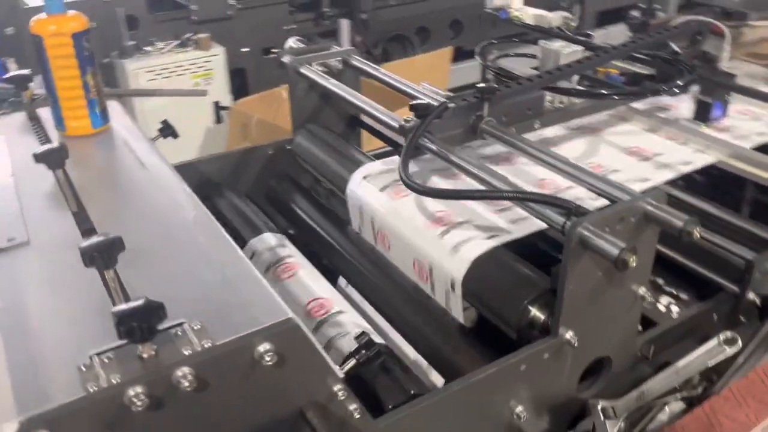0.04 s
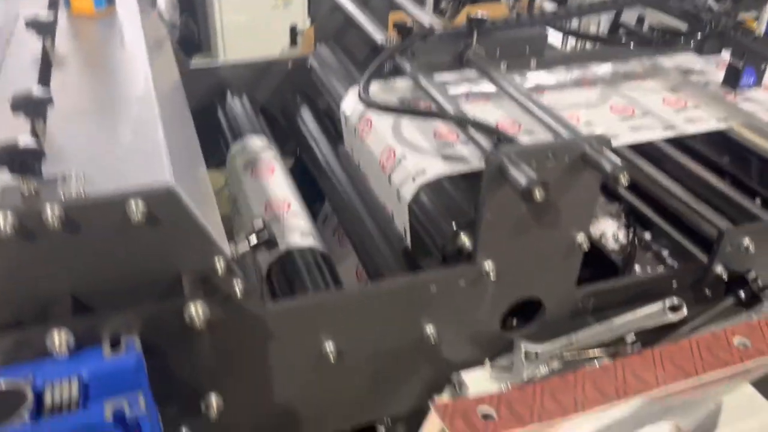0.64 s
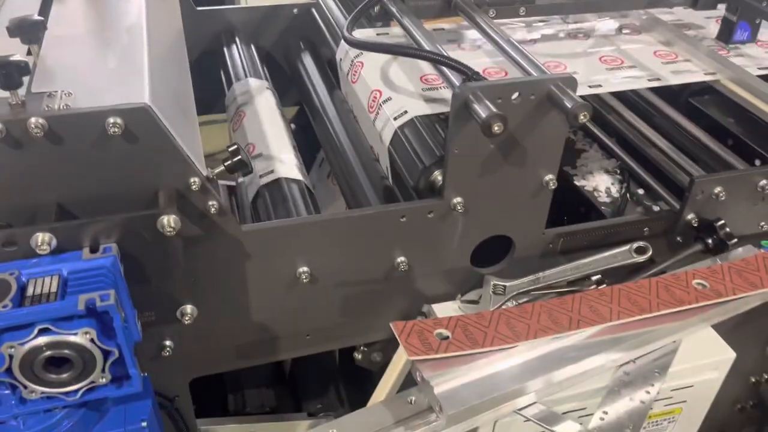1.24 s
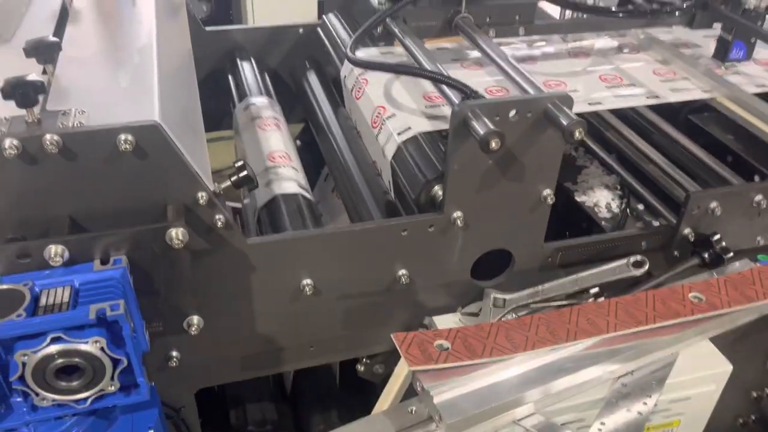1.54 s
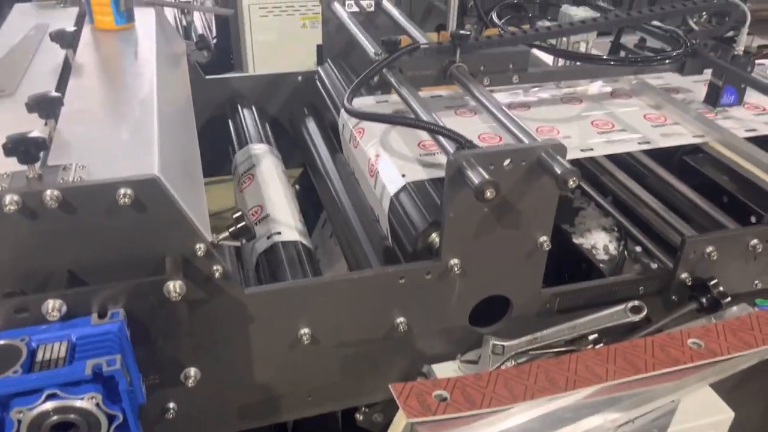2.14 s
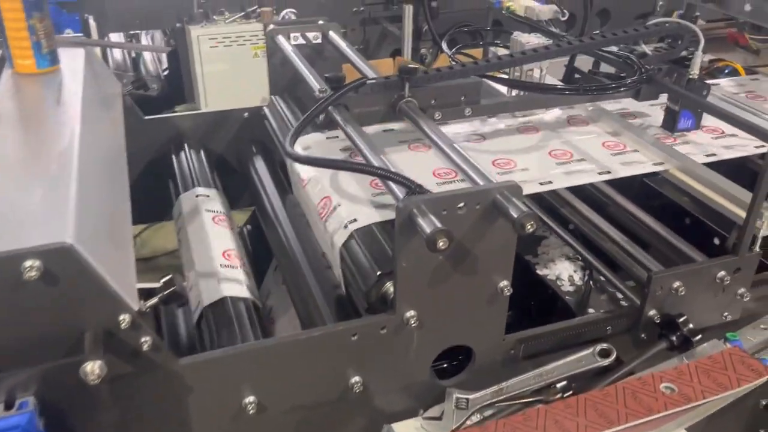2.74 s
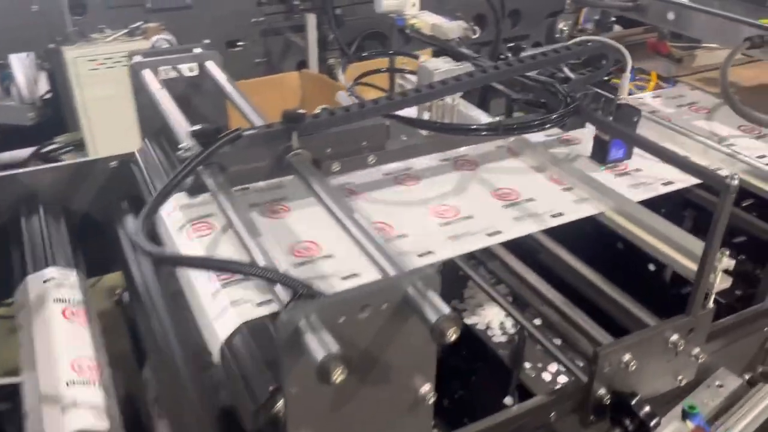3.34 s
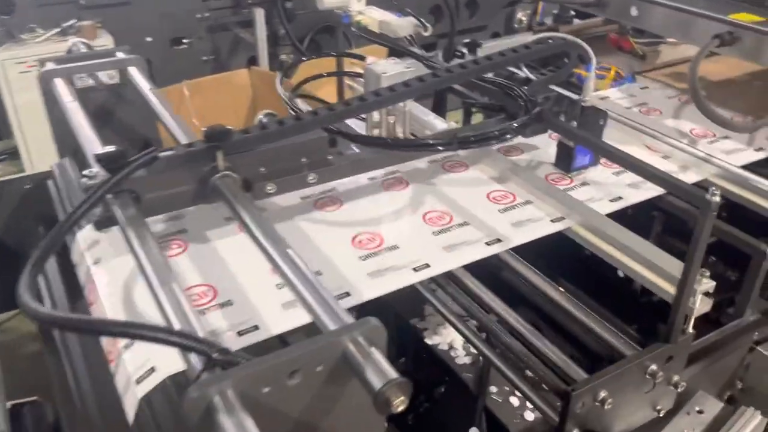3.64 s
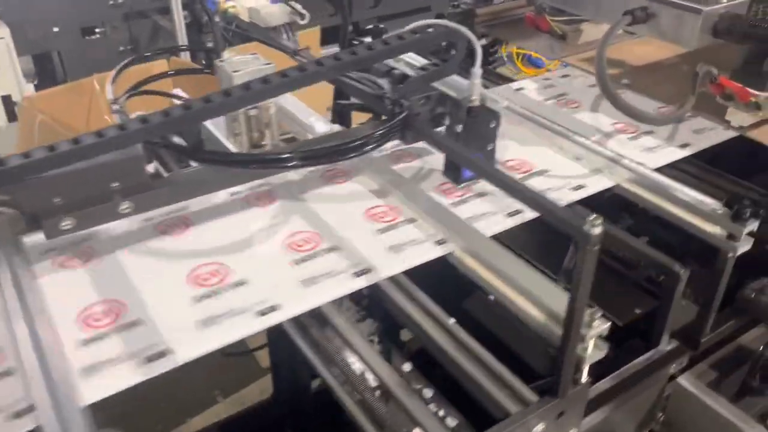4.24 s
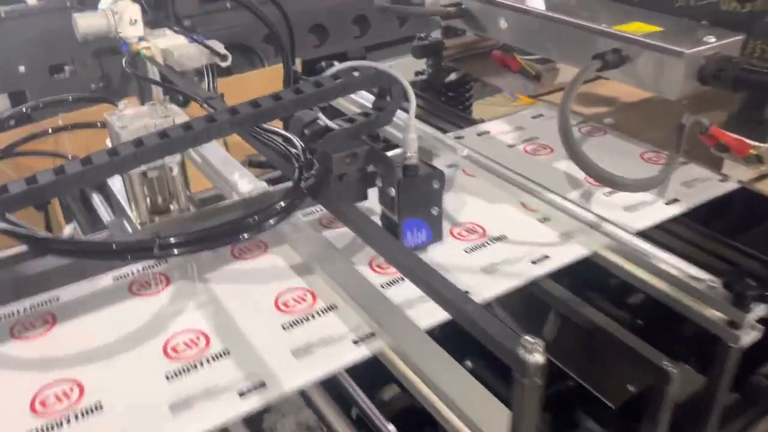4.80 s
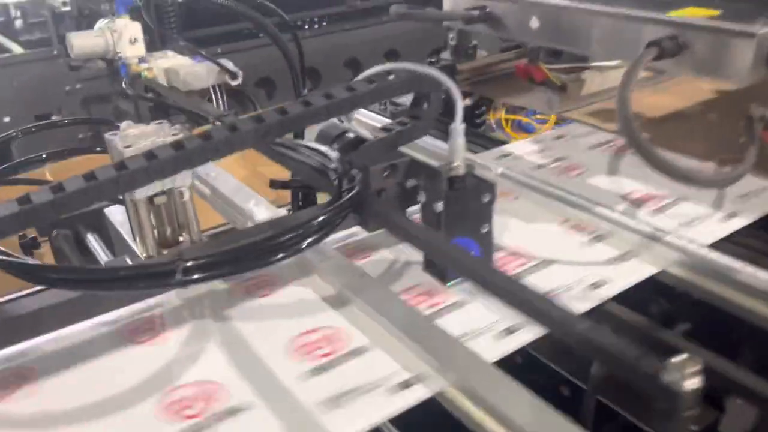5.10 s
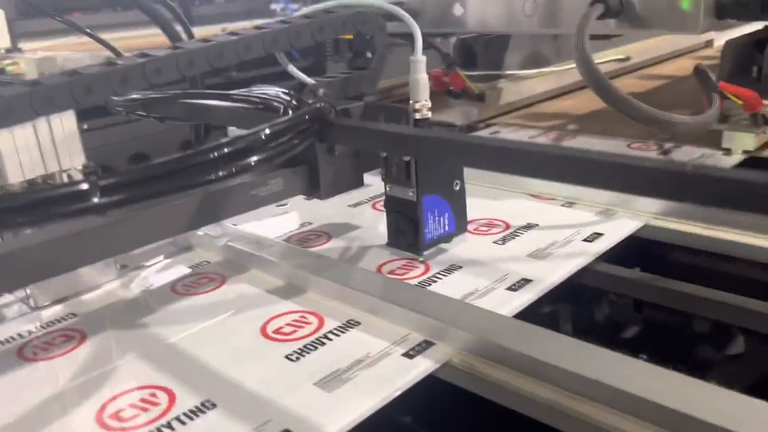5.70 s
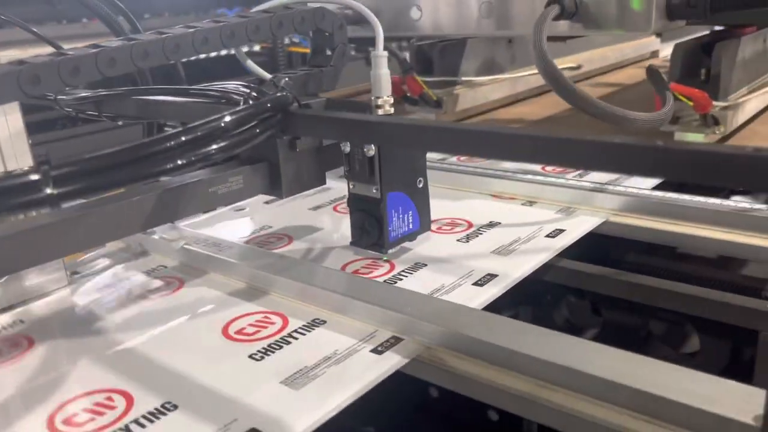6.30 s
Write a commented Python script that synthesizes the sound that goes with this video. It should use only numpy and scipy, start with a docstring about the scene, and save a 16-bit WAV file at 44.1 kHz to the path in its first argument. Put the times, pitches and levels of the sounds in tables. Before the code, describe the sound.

A pouch making machine runs throughout, close to a hand-held stereo microphone, over a factory hall's hum and a faint high whine that slowly fades. Each cycle starts with rollers knocking into motion and dragging rustling plastic film, with a brief rising and falling motor drone, low rumble and rattling loose parts. Then a valve ticks, air hisses and the tool lands with a short metal clank. A tenth of a second after the tick, the valve snaps back with a tiny squeak, a sharp crack slightly to the left and a burst of exhaust air. These double strokes come at about 0.2, 1.0, 1.9, 2.7, 3.6, 4.4, 5.3 and 6.1 seconds, each with a short reverberation. From around 3 seconds the ticks, cracks and hisses grow louder, and the frame thumps more deeply from about 4 seconds to the end.

```python
"""A pouch making machine runs at seventy cycles a minute over the hum and drive whine of a factory hall.
Each cycle begins as a motor turns the rollers, which drag the rustling film and shake the frame and its loose
parts. A valve ticks, turbulent air hisses into a cylinder, and the tool lands with a clank of ringing modes.
Then the valve snaps back with a squeak, the tool cracks free and the air blows off through resonant pipes.
The strokes reverberate in the hall, and everything reaches a hand-held stereo microphone."""
import sys
import numpy as np
from scipy import signal
from scipy.fft import rfft, irfft, next_fast_len
from scipy.io import wavfile
from scipy.ndimage import uniform_filter1d

SR = 44100
rng = np.random.default_rng(int(sys.argv[2]) if len(sys.argv) > 2 else 0)


def digitize_waveform(pressure):
    """Quantize a signal to 16-bit integers and store it at the path in sys.argv[1].

    Rows of a 2-D input are taken as channels; values are limited to [-1, 1].
    """
    field = np.atleast_2d(pressure).T
    bounded = np.clip(field, -1, 1)
    quanta = np.round(bounded * 32767).astype(np.int16)
    wavfile.write(sys.argv[1], SR, quanta)


N = 284886
TIME = np.arange(N) / SR

# film feeds, levels relative: start_s, knock_db, rustle_db, brake_db, motor_db, shake_db
FILM_FEEDS = [(-.15, -36, -30.5, -38, -31, -30.5), (.706, -35.5, -34.5, -39, -31, -41),
              (1.561, -34.5, -38, -38, -27.5, -47), (2.417, -35, -34, -42, -25, -40),
              (3.265, -36, -33, -35, -25.5, -38), (4.124, -30.5, -31.5, -34, -29, -32),
              (4.973, -31, -31.5, -33.5, -29.5, -28), (5.825, -30, -29.5, -35, -29, -28.5)]
# spectra of a dull knock and a bright rattle: frequency_hz, level_db
KNOCK_SPECTRUM = [(150, 1), (600, -6), (950, 3.5), (1500, -10), (2500, -9), (4000, -18.5), (7000, -18),
                  (15000, -57)]
RATTLE_SPECTRUM = [(500, 3), (2000, 7), (4500, 3), (6000, -7), (8000, -10), (15000, -20)]


def amp(db):
    """Amplitude ratio of a level in decibels."""
    return 10 ** (np.asarray(db) / 20)


def unit(x):
    """Normalisation of each channel to rms 1."""
    return x / np.sqrt(np.mean(x ** 2, -1, keepdims=True) + 1e-20)


def read(points, hz):
    """Interpolation of a table over log frequency."""
    knots, values = np.transpose(points)
    return np.interp(np.log1p(hz), np.log1p(knots), values)


def add(mix, start_s, sound):
    """Superposition: a stereo sound joins the mix if it starts within the scene."""
    start = round(start_s * SR)
    if 0 <= start < N:
        mix[:, start:start + sound.shape[1]] += sound[:, :N - start]


def convolve(x, response):
    """Linear filtering of both channels by an impulse response."""
    return signal.oaconvolve(x, response, axes=1)[:, :N]


def noise(spectrum, size=N):
    """Spectral shaping: two independent noises of one colour, rms 1."""
    n = next_fast_len(size, True)
    colour = amp(read(spectrum, np.fft.rfftfreq(n, 1 / SR)))
    return unit(irfft(rfft(rng.standard_normal((2, n))) * colour, n)[:, :size])


def drift(per_s):
    """Random modulation: a curve of spread about 1 through per_s points a second."""
    knots = rng.standard_normal(4096)
    return np.interp(TIME * per_s, np.arange(len(knots)), knots)


def impulses(per_s, size=N):
    """A Poisson process: impulses at random moments, of random strength in each channel."""
    return rng.standard_normal((2, size)) * (rng.random(size) < per_s / SR)


def burst(spectrum, t60, hold, rise=0.000066, size=8192):
    """Contact noise with exponential decay, rms 1 over its first hold seconds."""
    t = np.arange(size) / SR
    x = noise(spectrum, size) * amp(-60 * t / t60) * (1 - np.exp(-t / rise))
    return x / np.sqrt(np.mean(x[:, t <= hold] ** 2))


def ring(modes, detune, size=8192):
    """Free vibration: damped modes, slightly detuned at each blow, the channels in quadrature."""
    t = np.arange(size) / SR
    out = np.zeros((2, size))
    for hz, db, t60 in modes:
        pitch = hz * (1 + detune * rng.standard_normal())
        phase = rng.random() + np.array([[0], [rng.choice([-.25, .25])]])
        out += amp(db - 60 * t / t60) * np.sin(2 * np.pi * (pitch * t + phase))
    initial_rms = np.sqrt(sum(amp(db) ** 2 for _, db, _ in modes) / 2)
    return out * (1 - np.exp(-t / 0.0008)) / initial_rms


def click(spectrum, size=2048):
    """A minimum-phase pulse of the given colour, peak 1."""
    log_gain = np.log(amp(read(spectrum, abs(np.fft.fftfreq(size, 1 / SR)))))
    pulse = np.fft.ifft(np.exp(np.conj(signal.hilbert(log_gain)))).real
    return pulse / abs(pulse).max()


def factory():
    """Ambient noise: a broadband wash with narrow bands of motor hum and drive whine."""
    # spectrum of the hall: frequency_hz, level_db
    wash = [(20, -45), (35, -26), (55, -5.5), (100, -6), (140, -20.5), (300, -6.5), (450, -11.5),
            (700, -15.5), (1000, -19), (1400, -15), (1800, -23), (3600, -26.5), (4600, -27), (7000, -37),
            (11500, -41), (13000, -43), (15500, -51)]
    # motor hum and drive whine: pitch_hz, width_hz, level_db
    hum = [(60.6, 2.3, -50.5), (299.2, 5, -46)]
    whine = [(8005, 45, -45), (11995, 90, -56)]
    whine_fade_db_per_s = 2.2  # the microphone moves away from the drives
    out = amp(-34) * noise(wash) * amp(0.95 * drift(45))
    for tones, fade in ((hum, 0), (whine, whine_fade_db_per_s)):
        for hz, width, db in tones:
            waver = np.array([drift(2 * width) + 1j * drift(2 * width) for _ in range(2)])
            out += amp(db - fade * TIME) * unit((waver * np.exp(2j * np.pi * hz * TIME)).real)
    return out


def film_feed():
    """Impact and friction: the rollers start with a knock, drag the rustling film along and brake."""
    # modes of the roller frame: pitch_hz, level_db, t60_s
    modes = [(810, -4, 0.16), (1050, 2, 0.18), (1206, 8, 0.12), (1420, -12, 0.09), (2190, -15, .08)]
    # spectra of the sliding film and the braking knock: frequency_hz, level_db
    film = [(250, 0), (450, -6), (900, -5.5), (1300, -23), (1800, -14), (2500, -49), (6000, -42),
            (9000, -32), (15000, -33.5)]
    brake = [(200, -12), (700, -11), (1150, 10), (1600, 1), (4000, -70), (15000, -45)]
    out, drag = np.zeros((2, N)), np.zeros(N)
    for s, knock_db, rustle_db, brake_db, *_ in FILM_FEEDS:
        add(out, s, amp(knock_db - 1) * burst(KNOCK_SPECTRUM, t60=0.33, hold=0.058, rise=0.003))
        add(out, s + .002, amp(knock_db - 3) * burst(RATTLE_SPECTRUM, t60=.04, hold=.0044, rise=.0005))
        add(out, s + 0.00296, amp(knock_db - 3) * ring(modes, detune=0.03))
        add(out, s + 0.19, amp(brake_db - 3) * ring(modes, detune=0.029))
        add(out, s + .208, amp(brake_db) * burst(brake, t60=0.15, hold=0.017, rise=0.0022))
        drag += amp(rustle_db) * np.interp(TIME - s, [0, .025, .14, .24, .31], [.04, .97, .86, .53, .0045])
    rustle = amp(-0.05) * noise(film) * amp(2.2 * drift(120))
    clacks = amp(-10.5) * bearing_chatter(per_s=60, spread_db=2.5)
    crackle = amp(-14) * film_crinkle(per_s=160, spread_db=2)
    return out + drag * (rustle + clacks + crackle)


def bearing_chatter(per_s, spread_db, parts=6):
    """Random impacts: rollers and guide bars clack in their bearings, each with its own response."""
    # spectrum of a clack: frequency_hz, level_db
    bearing = [(200, 1), (600, 2), (1100, -11), (1600, 3), (2300, -7.5), (4000, -13), (8000, -37)]
    knocks = impulses(per_s) * amp(spread_db * np.minimum(rng.exponential(1, N), 2))
    struck = rng.integers(0, parts, N)
    responses = [burst(bearing, t60=0.063, hold=.003, size=4096) for _ in range(parts)]
    return unit(sum(convolve(knocks * (struck == k), responses[k]) for k in range(parts)))


def film_crinkle(per_s, spread_db):
    """Crackling noise: the film gives many tiny snaps, a few of them large."""
    # spectrum of a snap: frequency_hz, level_db
    spectrum = [(300, -36), (1000, -34), (2500, 9), (6000, -0.5), (15000, -12.5)]
    snaps = impulses(per_s) * amp(spread_db * np.minimum(rng.exponential(1, N), 3))
    return unit(convolve(snaps, burst(spectrum, t60=0.032, hold=.002, size=1024)))


def feed_motor():
    """Rotational tone: a rough drone whose pitch rises and falls with the speed of the rollers."""
    # run-up and braking, levels relative: after_s, pitch_hz, level_db
    run = [(.02, 87.8, -31), (0.075, 154.2, -10.5), (0.14, 190, -3.5), (0.185, 159.7, -11),
           (.25, 117.6, -4), (.31, 70, -28)]
    after, hz, db = np.transpose(run)
    out = np.zeros((2, N))
    for s, *_, motor_db, _ in FILM_FEEDS:
        on = (TIME > s + after[0]) & (TIME < s + after[-1])
        t = TIME[on] - s
        turns = np.cumsum(np.interp(t, after, hz)) / SR + rng.random((2, 1))
        tone = np.sqrt(2) * np.sin(2 * np.pi * turns + 0.53 * drift(70)[on])
        out[:, on] += amp(motor_db + np.interp(t, after, db)) * tone
    return out * amp(1.6 * drift(60))


def frame_rumble():
    """Forced vibration: the rollers shake the frame and the linkage jolts it; their powers add."""
    # spectra of the deep shake and the body of the rumble: frequency_hz, level_db
    deep = [(20, -42), (35, -42), (50, -0.5), (75, -3), (105, -5), (200, -67)]
    body = [(25, -45), (55, -34), (98, 2), (130, -3), (175, 1.5), (230, -3), (320, -15), (450, -15),
            (900, -77)]
    # jolts at the same points of every cycle: after_s, deep_db, body_db
    jolts = [(.395, -47, -34.5), (.45, -40, -37), (.505, -35, -32), (.595, -41, -49), (.725, -27, -40),
             (.805, -30.5, -31)]
    idle_deep_db, idle_body_db, roller_db = -40.5, -37.5, -28.5
    rise_s, hold_s, fall_s = 0.083, 0.11, 0.15
    jolt_rise_s, jolt_decay_s = 0.018, 0.042
    lag_s = .035  # the heavy frame follows the rollers late
    deep_power, body_power = np.full(N, amp(idle_deep_db) ** 2), np.full(N, amp(idle_body_db) ** 2)
    corners = np.cumsum([0, rise_s, hold_s, fall_s])
    for s, *_, shake_db in FILM_FEEDS:
        deep_power += np.interp(TIME - s - lag_s, corners, [0, 1, 1, 0]) * amp(shake_db) ** 2
        body_power += np.interp(TIME - s, corners, [0, 1, 1, 0]) * amp(roller_db) ** 2
        cycle = (TIME > s) & (TIME < s + 1)
        for after, deep_db, body_db in jolts:
            t = TIME[cycle] - s - after
            jolt = np.clip(1 + t / jolt_rise_s, 0, 1) * np.exp(-np.maximum(t, 0) / jolt_decay_s)
            deep_power[cycle] += (amp(deep_db) * jolt) ** 2
            body_power[cycle] += (amp(body_db) * jolt) ** 2
    return noise(deep) * np.sqrt(deep_power) + noise(body) * np.sqrt(body_power)


def frame_bumps():
    """Damped oscillation: the frame swings in two low modes when the rollers jerk it."""
    # heavy bumps: start_s, pitch_hz, level_db
    bumps = [(0, 171, -14.5), (.79, 168.5, -20), (1.69, 194, -21), (1.78, 126, -24), (2.545, 157, -19.5),
             (2.62, 125, -24), (3.313, 171, -19.5), (3.352, 151, -15.5), (4.355, 72, -21), (5.13, 98, -16),
             (5.859, 85, -15), (5.944, 74, -13), (5.995, 52, -18), (6.149, 55.5, -19)]
    out = np.zeros((2, N))
    onset = 1 - np.exp(-TIME[:8192] / 0.0046)
    for s, hz, db in bumps:
        add(out, s, amp(db) * ring([(hz, 0, .16), (hz * 1.8, -12, .11)], detune=0.016) * onset)
    return out


def loose_parts():
    """Impact noise: loose parts give a few clear knocks and ticks over a faint random clatter."""
    # clear rattles: start_s, knock_db, tick_db
    rattles = [(0.053, -36, -38), (.572, -35, -39), (0.914, -46, -54), (1.415, -44, -34.5),
               (1.694, -32, -47), (1.768, -39, -46), (2.291, -36, -41), (2.444, -37, -38),
               (2.626, -33, -37), (3.266, -37, -38), (4.255, -46, -35), (4.329, -34, -49),
               (5.122, -46, -35.5), (5.729, -44, -33.5), (5.952, -36, -38), (6.039, -41, -49)]
    clatter_per_s, clatter_db = 4, -37.5
    out = np.zeros((2, N))
    for s, knock_db, tick_db in rattles:
        add(out, s, amp(knock_db) * burst(KNOCK_SPECTRUM, t60=0.096, hold=0.0033))
        add(out, s, amp(tick_db) * burst(RATTLE_SPECTRUM, t60=0.05, hold=0.0079, rise=0.00069))
    knocks = (rng.random(N) < clatter_per_s / SR) * amp(clatter_db - rng.standard_normal((2, N)))
    return out + convolve(knocks, burst(KNOCK_SPECTRUM, t60=0.039, hold=0.0037))


def down_stroke():
    """Impact excites modes: a valve ticks, air drives the piston, and the tool lands and bounces."""
    # strokes, levels relative: start_s, tick_db, hiss_db, tilt_db_per_octave, clank_db, ring_hz
    strokes = [(0.1566, -19, -24, 0.5, -21.5, 920), (1.0125, -22, -25, 1, -23.5, 928),
               (1.867, -23.5, -24.5, 1.5, -23, 917), (2.7213, -23, -23.5, 0.5, -21.5, 932),
               (3.576, -19, -22, 0.8, -21, 905), (4.4303, -17, -22, 0, -21, 884),
               (5.2855, -14, -21, -0.8, -18.5, 864), (6.1382, -11.5, -20, -0.4, -21.5, 884)]
    # air flow into the cylinder: after_s, level_db
    fill_flow = [(.0055, -12), (.008, 1), (.016, 2.5), (.03, -0.5), (.047, -0.5), (.056, -15), (.09, -22),
                 (.14, -60)]
    # spectra of the stroke's noises: frequency_hz, level_db
    tick = [(200, -15), (1500, -1), (4000, -2.5), (7000, -1), (12500, 4), (15500, 7)]
    push = [(25, -16), (70, 1), (190, -6), (300, -11), (900, -46), (3000, -70)]
    piston = [(200, -3), (450, 2), (700, -19), (2000, -25)]
    hiss = [(300, 4.5), (800, 0), (1400, -1), (2300, -2.5), (3300, -2), (5000, -4), (7000, -5.5), (8500, 2),
            (10000, 0), (12000, 4), (13500, 1), (15400, 0)]
    steel = [(150, -3), (600, 4), (1100, 3.5), (1600, 6.5), (2500, -1.5), (3300, -9), (6000, -16),
             (15000, -36)]
    clack = [(300, -14), (580, -7), (740, -7.5), (890, 4), (1020, -4), (1150, -10), (1520, -9.5),
             (1950, -18), (2700, -13.5), (3200, -21), (8000, -36)]
    # modes of the tool and its frame: pitch_hz, level_db, t60_s
    tool_modes = [(576, -6, .1), (995, -3, .06), (1200, -7, .05), (1345, -7, .05), (1530, -6, .05),
                  (1745, -8, .06), (2290, -9, .05), (2740, -8, .06)]
    travel_s, bounce_s = .046, .013
    pad_t60_s = .095  # the sealing pad damps the strongest mode
    out = np.zeros((2, N))
    for s, tick_db, hiss_db, tilt_db, clank_db, ring_hz in strokes:
        add(out, s, amp(tick_db - 3.5) * burst(tick, t60=0.016, hold=0.0027))
        add(out, s + 0.00687, amp(hiss_db - 3.5) * burst(push, t60=0.18, hold=0.014))
        add(out, s + 0.00714, amp(hiss_db - 6) * burst(piston, t60=0.043, hold=0.0033))
        jet = air_jet(fill_flow, hiss, tilt_db, eddy_db=3, whistle_db=3, flutter_db=0.9)
        add(out, s, amp(hiss_db + 2) * frame_echoes(jet, echo_db=-9, spread_s=0.009))
        # steel faces chatter as they meet; the frame rings briefly and rattles on
        landing_s = s + travel_s
        modes = [(ring_hz, 1, pad_t60_s)] + tool_modes
        clank = ring(modes, detune=0.016) + amp(-5) * burst(steel, t60=0.06, hold=0.01, rise=0.0004)
        add(out, landing_s, amp(clank_db) * clank)
        add(out, landing_s, amp(clank_db - 3) * burst(steel, t60=0.0042, hold=0.002))
        add(out, landing_s, amp(clank_db - 5) * burst(clack, t60=0.19, hold=0.026, rise=0.0021))
        add(out, landing_s + bounce_s, amp(clank_db - 8) * ring(modes[:3], detune=0.027))
    return out


def air_jet(flow, spectrum, tilt_db, eddy_db, whistle_db, flutter_db, size=16384):
    """Turbulence: jet noise follows the flow; eddies shift its colour and whistles come and go."""
    after, flow_db = np.transpose(flow)
    tilted = [(hz, db + tilt_db * np.log2(hz)) for hz, db in spectrum]
    bands = signal.stft(noise(tilted, size), nperseg=1024, noverlap=768)[2]
    eddies, whistles = rng.standard_normal((2,) + bands.shape[1:])
    eddies = uniform_filter1d(uniform_filter1d(eddies, size=6, axis=0), size=6, axis=1)
    whistles = uniform_filter1d(whistles, size=14, axis=1)
    bands *= amp(eddy_db * eddies / eddies.std() + whistle_db * whistles / whistles.std())
    jet = unit(signal.istft(bands, nperseg=1024, noverlap=768)[1][:, :size])
    jet = unit(jet + amp(-9) * droplets(size))
    t = TIME[:size]
    valve_open = (t >= after[0]) & (t < after[-1])
    return jet * amp(np.interp(t, after, flow_db) + flutter_db * drift(395)[:size]) * valve_open


def droplets(size, per_s=220):
    """Shot noise: droplets of oil and water are spat out with the air at random moments."""
    spit = [(1000, -14), (3000, -2), (7000, 4), (14000, -2)]  # frequency_hz, level_db
    return unit(convolve(impulses(per_s, size), burst(spit, t60=0.0082, hold=.001, size=512))[:, :size])


def frame_echoes(x, echo_db, spread_s, count=14):
    """Comb filtering: steel plates and bars close by return a few quick echoes."""
    taps = np.zeros((2, 2048))
    delay = np.clip(rng.uniform(.001, spread_s, (2, count)) * SR, 1, 2047).astype(int)
    gains = rng.choice([-1, 1], delay.shape) * amp(echo_db) / np.sqrt(count)
    np.put_along_axis(taps, delay, gains, 1)
    taps[:, 0] = 1
    return convolve(x, taps / np.linalg.norm(taps[0]))


def hall_reverberation(x, size=32768):
    """Reverberation: a diffuse tail builds up and decays, its treble first."""
    # reverberation times: frequency_hz, t60_s
    decay = [(100, 1), (1000, 0.78), (4000, 0.52), (14000, 0.14)]
    hz, t, bands = signal.stft(rng.standard_normal((2, size)), SR, nperseg=256)
    bands = bands * amp(-60 * t / read(decay, hz)[:, None]) * (1 - np.exp(-t / 0.0076))
    tail = signal.istft(bands, SR)[1]
    return convolve(x, tail / np.linalg.norm(tail[0]))


def return_stroke():
    """Impact, then jet noise: the valve snaps back with a double click and the cylinder vents."""
    # strokes, levels relative: start_s, snap_db, squeak_db, exhaust_db, tilt_db_per_octave, swell_db_per_s
    strokes = [(0.2514, -25.5, -18, -23, -0.5, 6), (1.106, -24, -21, -23, -0.2, 0),
               (1.96, -24, -21, -22.5, 0, 7), (2.8145, -22, -22, -23, -1, 9),
               (3.6682, -20.5, -13, -21, 0, -1), (4.523, -18, -10, -20, -0.2, 0),
               (5.3783, -16, -6, -18, .5, 5), (6.2312, -15, -12, -17, 0.6, -8)]
    # air flow out of the cylinder: after_s, level_db
    vent_flow = [(0, -28), (.012, -6), (.0245, -7.5), (.03, 0), (.045, 1), (.065, -0.5), (0.104, 0),
                 (.14, -8), (.19, -19), (.33, -52)]
    # spectra of the valve's snap, its seat and the exhaust: frequency_hz, level_db
    snap = [(30, -10), (200, 11), (900, 12), (1500, -2), (2200, -2), (2900, 8), (3500, 1), (4600, 13),
            (5500, 7), (7000, 7), (8800, 11), (11500, 9), (13000, 6), (15500, 5)]
    seat = [(40, -7), (220, 3.5), (400, -10.5), (1500, -44)]
    hiss = [(300, 2), (900, -1), (1500, 4), (2000, 4.5), (2600, 4), (3200, 3.7), (3900, 2.3), (4700, 1),
            (5300, 2), (7200, 1.5), (8400, -2.5), (9400, -1), (12000, 2), (13000, -2), (15400, -2)]
    out, exhaust = np.zeros((2, N)), np.zeros((2, N))
    for s, snap_db, squeak_db, exhaust_db, tilt_db, swell_db_per_s in strokes:
        add(out, s - .0003, amp(snap_db + 2.8) * burst(snap, t60=0.016, hold=0.002, rise=0.0002))
        add(out, s + .0045, amp(snap_db - 1.5) * burst(snap, t60=0.03, hold=0.004, rise=.0007))
        add(out, s + 0.00457, amp(snap_db - 7.5) * burst(seat, t60=0.046, hold=0.0068, rise=.0007))
        add(out, s, amp(squeak_db) * spool_squeak())
        jet = air_jet(vent_flow, hiss, tilt_db, eddy_db=2.5, whistle_db=2, flutter_db=0.5)
        jet *= amp(swell_db_per_s * (TIME[:jet.shape[1]] - 0.04))
        add(exhaust, s, amp(exhaust_db - 0.3) * frame_echoes(jet, echo_db=-12, spread_s=.005, count=8))
    return out + pipework(exhaust)


def spool_squeak(size=1024):
    """Sliding friction: the valve spool gives a brief falling chirp as it slides home."""
    peak_s, width_s, pitch_hz, sag_hz_per_s = 0.0079, 0.0028, 7870, 130000
    t = TIME[:size] - peak_s
    turns = pitch_hz * (1 + 0.011 * rng.standard_normal()) * t - sag_hz_per_s * t ** 2 / 2
    return np.sin(2 * np.pi * (turns + rng.random((2, 1)))) / (1 + (t / width_s) ** 4)


def pipework(x):
    """Resonance: the exhaust port and pipes lift narrow bands of the jet."""
    # resonances of the air passages: centre_hz, width_hz, gain_db
    resonances = [(2060, 160, 3), (2445, 40, 4.5), (2850, 60, 2), (3510, 50, 2), (3945, 110, 4),
                  (4175, 50, 3.5), (5120, 70, 2), (5480, 40, 3), (5991, 30, 4.5), (6570, 90, 2.5),
                  (11670, 90, 6), (12280, 200, 7)]
    n = next_fast_len(N + 2048, True)
    hz = np.fft.rfftfreq(n, 1 / SR)
    gain = 1 + sum((amp(db) - 1) / (1 + 2j * (hz - centre) / width) for centre, width, db in resonances)
    return irfft(rfft(x, n) * gain, n)[:, :N]


def tool_cracks():
    """Sudden release: the tool breaks free with a pulse that arrives first and strongest on the left."""
    # releases: start_s, peak_db
    releases = [(.2675, -7), (1.1226, -8), (1.9775, -7.5), (2.8313, -4), (3.6855, -2.5), (4.54, -2.2),
                (5.3954, -1.3), (6.2481, -1.3)]
    # spectrum of the pulse: frequency_hz, level_db
    crack = [(30, -20), (150, -8), (700, -2), (1300, -2), (2100, 3), (4000, 2), (5200, -6), (8500, -22),
             (11500, -11), (15000, -26)]
    left, right = np.array([[1], [0]]), np.array([[0], [1]])
    out = np.zeros((2, N))
    for s, db in releases:
        add(out, s, amp(db) * click(crack) * left)
        add(out, s + .00005, amp(db - 10.5) * click(crack) * right)
        add(out, s, amp(db - 19) * burst(crack, t60=0.0061, hold=0.0012))
    return out


def microphone_pair(x, coherence):
    """Partial coherence: a common and a scattered part reach two microphones, unequal in level and phase."""
    # level difference: frequency_hz, left_minus_right_db
    balance = [(80, 1.2), (800, 3.2), (1600, -.8), (2000, 2.6), (3800, 3.5), (6400, 1.3), (8800, 0)]
    # phase difference: frequency_hz, left_lead_rad
    phase = [(400, 0), (800, .25), (1200, -.8), (1600, -3), (1900, .2), (3400, 1.2), (4700, .5),
             (5400, -.8), (6400, -1.1), (7400, -1.9), (7900, -3.1), (9000, -3.2), (9600, -4.4),
             (11000, -6.2), (12800, -6.4), (14000, -8), (14600, -9.4)]
    n = next_fast_len(N + 2048, True)
    hz = np.fft.rfftfreq(n, 1 / SR)
    common, scattered = rfft(x, n)
    likeness = np.clip(read(coherence, hz), -1, 1)
    common *= np.sqrt((1 + likeness) / 2)
    scattered *= np.sqrt((1 - likeness) / 2)
    lean = np.sqrt(amp(read(balance, hz)))
    left = (common + scattered) * lean
    right = (common - scattered) * np.exp(-1j * read(phase, hz)) / lean
    return irfft(np.array([left, right]), n)[:, :N]


def scene():
    """Superposition of the strokes close by and the feed, frame and hall around them."""
    # left-right likeness of near and far sounds: frequency_hz, coherence
    near = [(90, .975), (400, .7), (1100, .26), (1900, .88), (3400, .56), (5400, .5), (7400, .8),
            (7900, .998), (9000, .998), (9800, .92), (13800, .92), (14700, .998)]
    far = [(90, .975), (400, .64), (900, .2), (1900, .65), (3600, .35), (5400, .22), (8200, .995),
           (13000, .96)]
    strokes, cracks = down_stroke() + return_stroke(), tool_cracks()
    around = film_feed() + feed_motor() + loose_parts() + frame_rumble() + frame_bumps() + factory()
    around += amp(-10) * hall_reverberation(strokes + cracks)
    return microphone_pair(strokes, near) + cracks + microphone_pair(around, far)


def record(dry):
    """Band limiting: the microphones lose the deepest bass, and a low-pass cuts the highest treble."""
    bass_hz, edge_hz = 24, 15750
    dry = signal.sosfilt(signal.butter(2, bass_hz, "highpass", fs=SR, output="sos"), dry)
    low_pass = signal.firwin(511, edge_hz, window=("kaiser", 9), fs=SR)
    return signal.oaconvolve(dry, low_pass[None], "same")


dry = scene()
out = record(dry)
digitize_waveform(out)
```